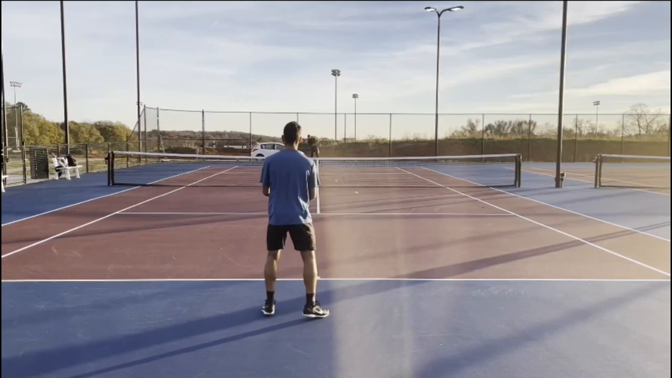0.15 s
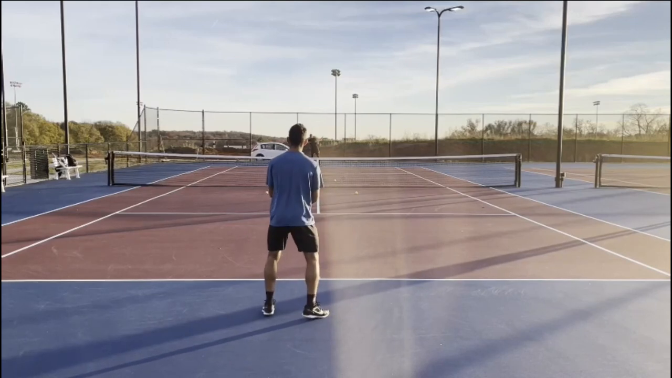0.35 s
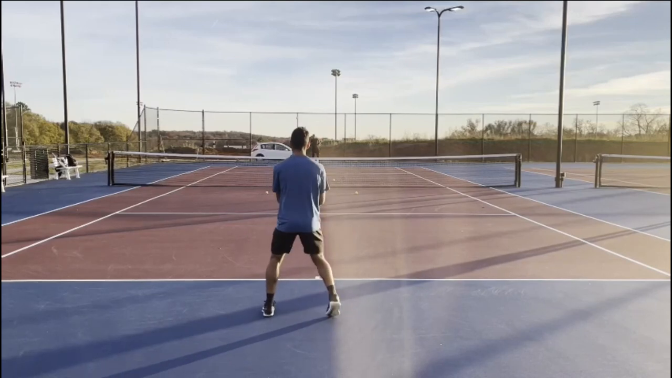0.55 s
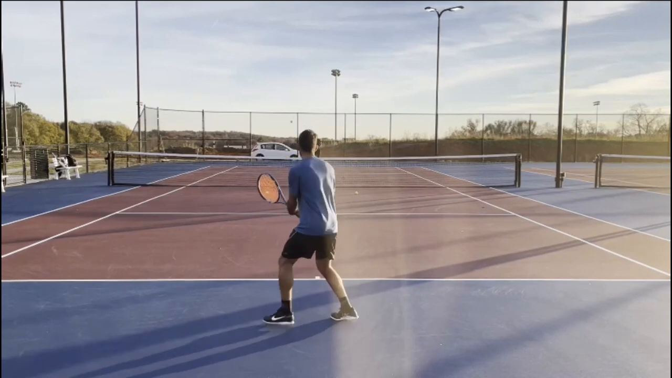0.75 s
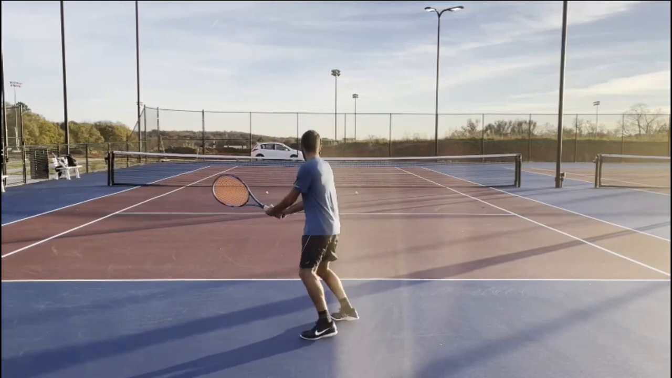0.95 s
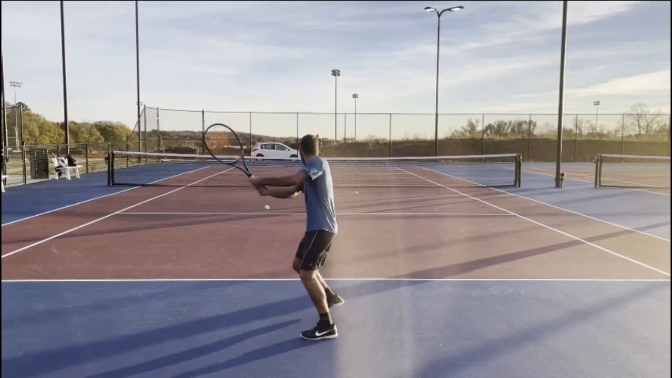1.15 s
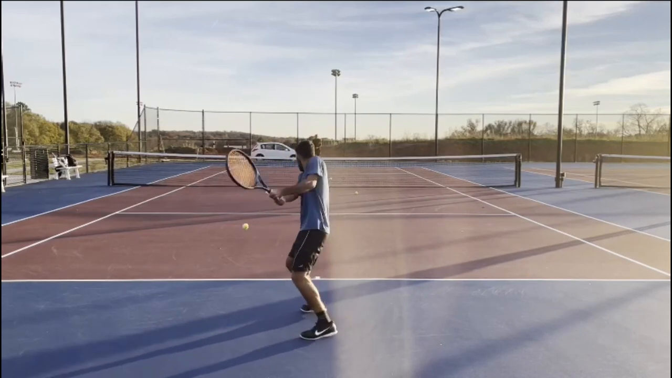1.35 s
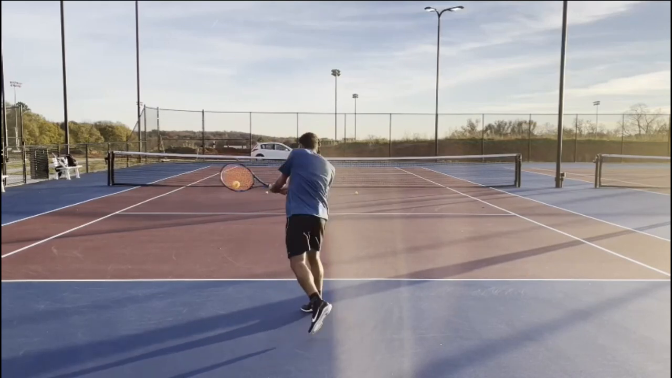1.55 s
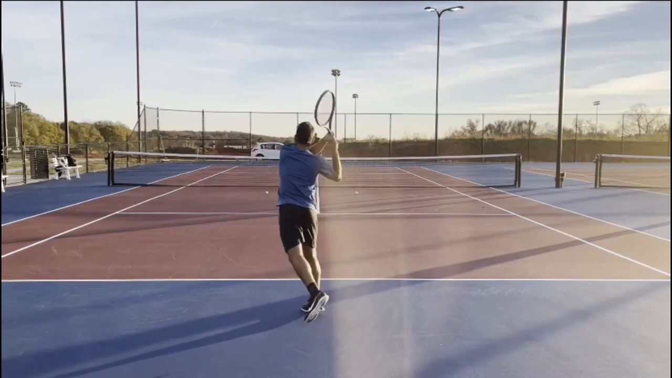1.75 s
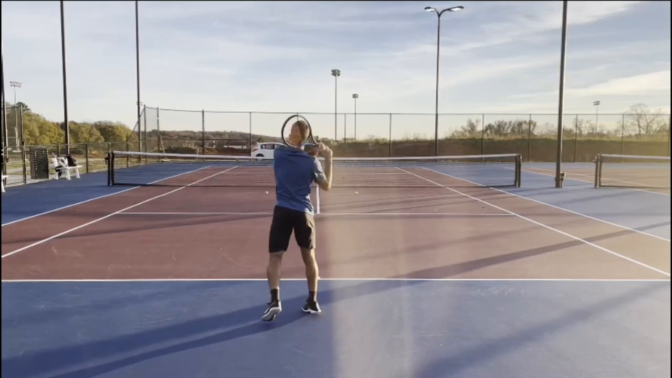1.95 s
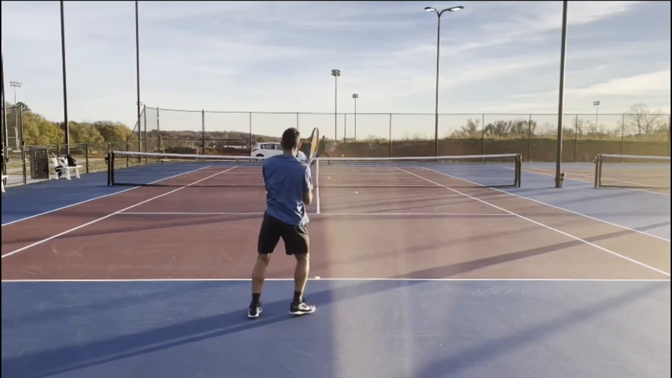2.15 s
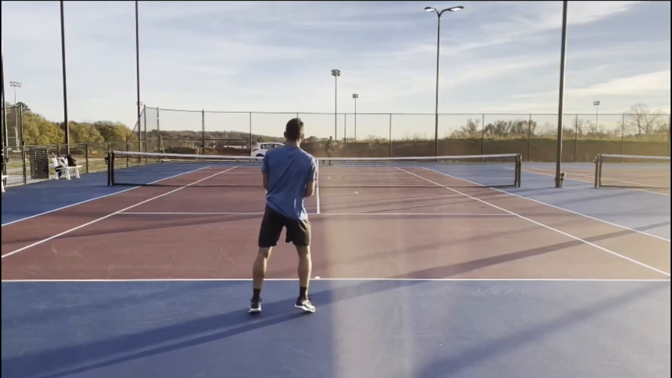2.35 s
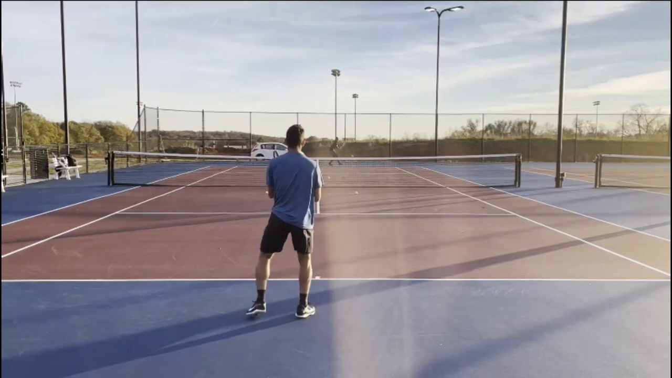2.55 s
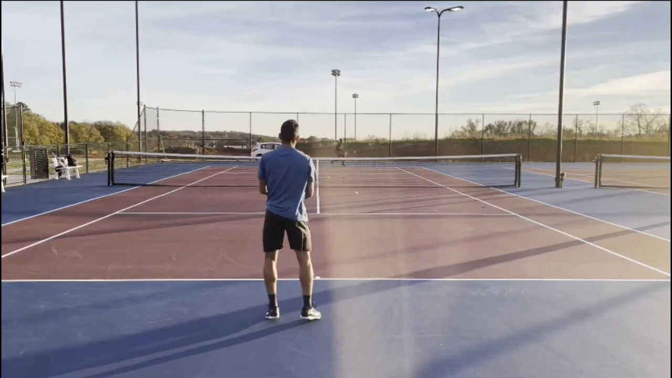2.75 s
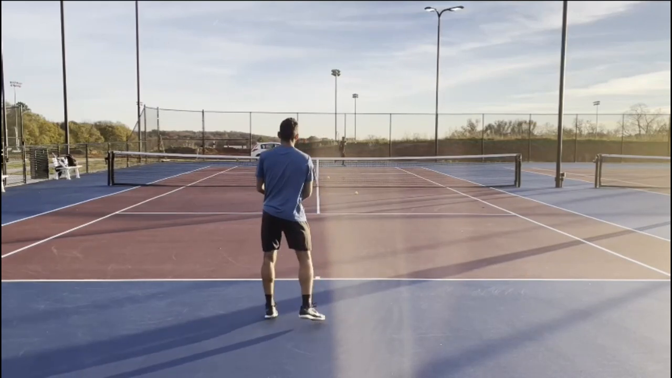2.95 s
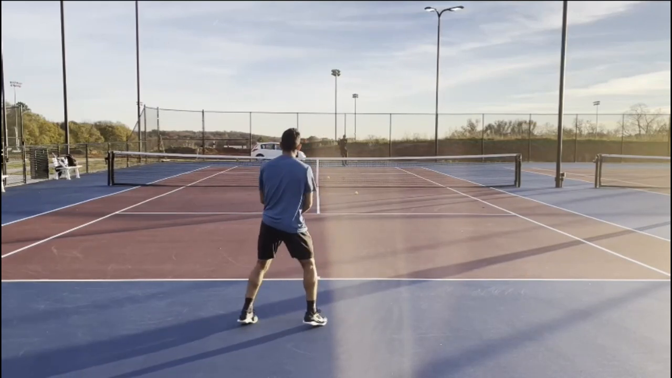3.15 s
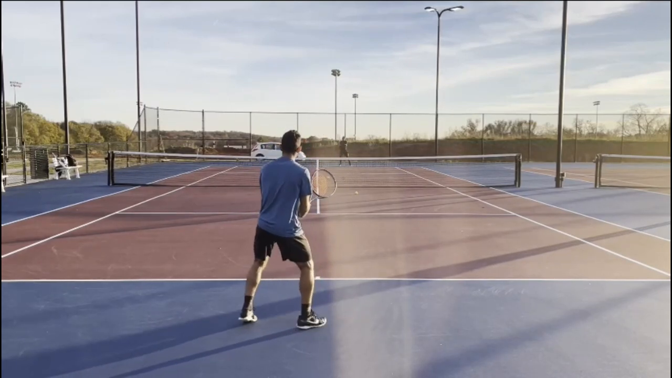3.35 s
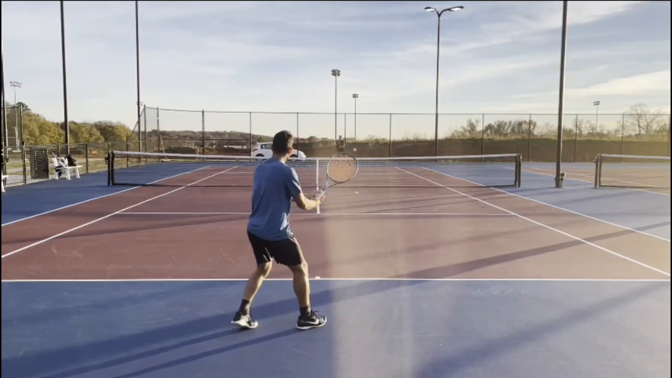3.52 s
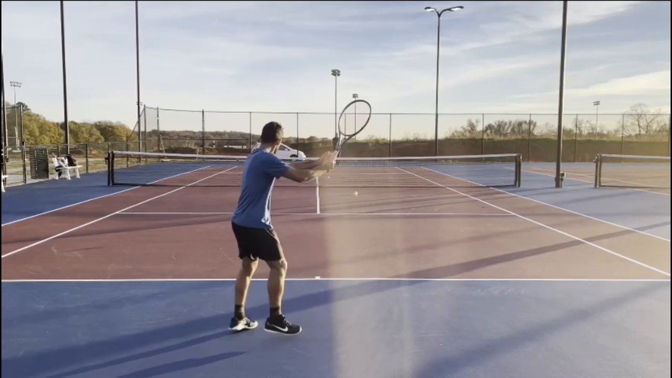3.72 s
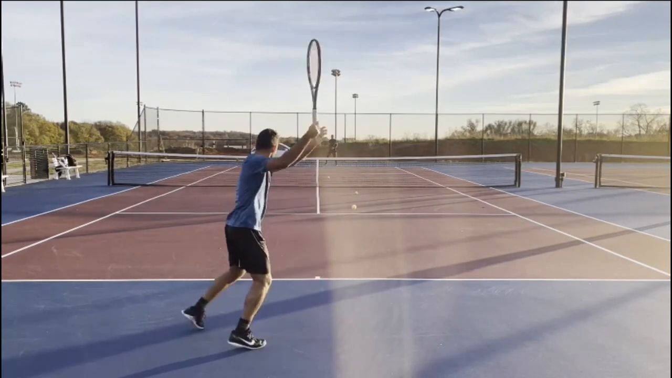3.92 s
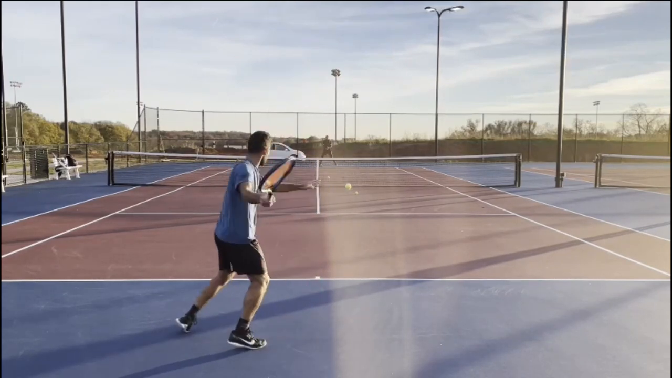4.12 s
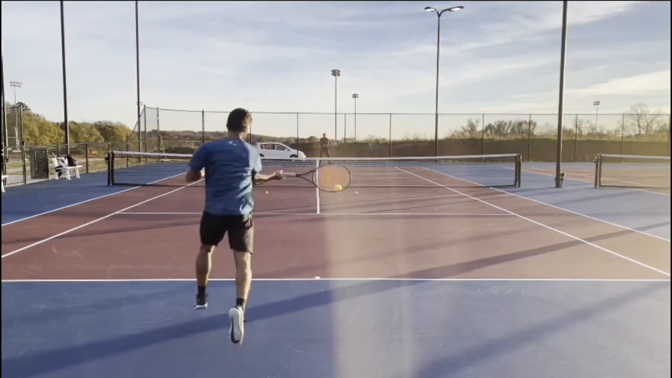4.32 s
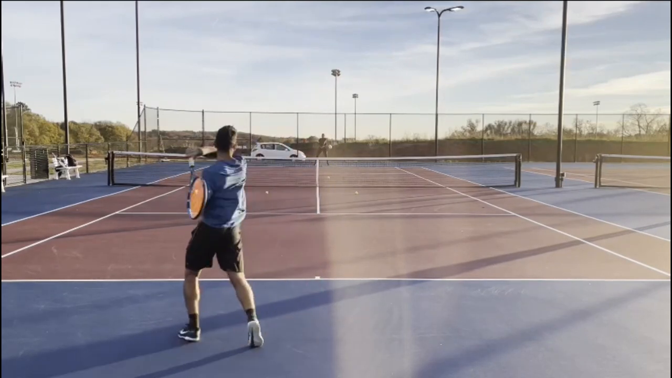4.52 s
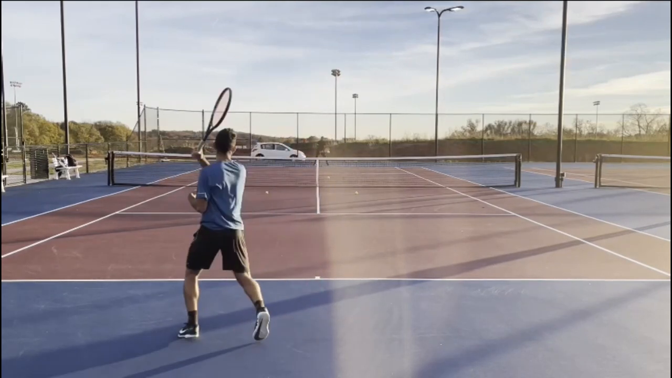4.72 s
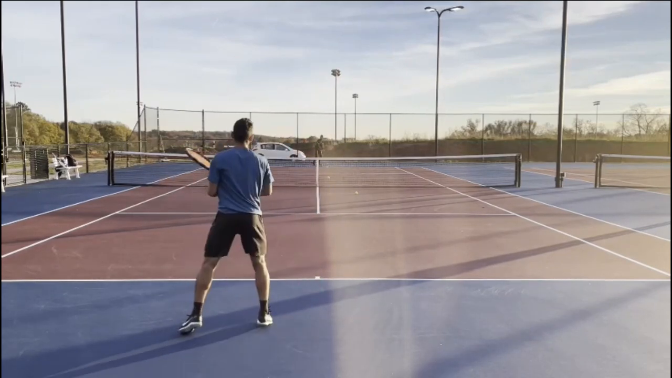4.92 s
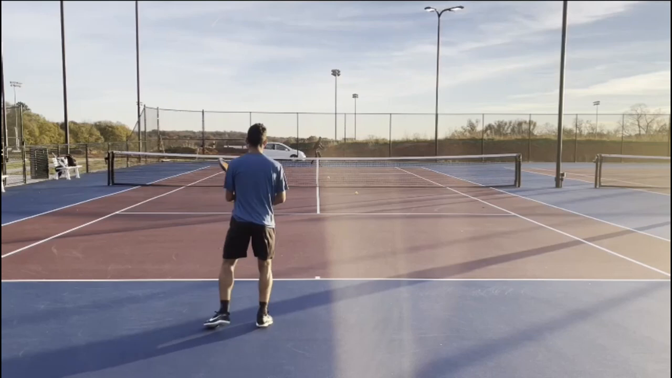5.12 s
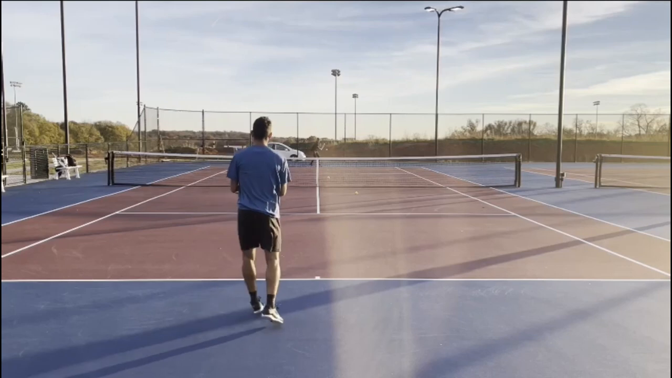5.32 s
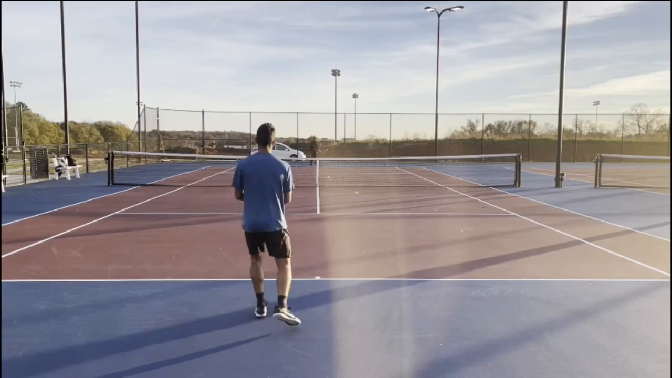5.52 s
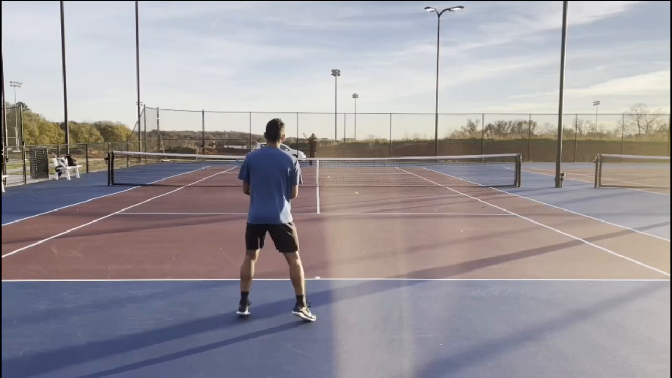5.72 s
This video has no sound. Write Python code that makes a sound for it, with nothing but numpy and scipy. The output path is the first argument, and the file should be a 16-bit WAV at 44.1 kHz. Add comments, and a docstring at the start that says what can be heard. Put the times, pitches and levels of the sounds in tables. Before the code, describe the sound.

On an outdoor hard court, heard from just behind the near player, a faint hollow pock comes from the far side. The tennis ball bounces and the close racket hits it with a sharp pop and briefly ringing strings. The far racket answers, and the bounce, close hit and distant reply repeat. Shoes scuff, thump and squeak lightly between strokes. Each hit has a short echo, and distant traffic rumbles faintly underneath.

```python
"""A faint, hollow pock comes from across an outdoor tennis court, over the rumble of distant traffic.
A rally follows, heard from just behind the near player, whose racket pops and cracks as the ball
squeezes against the strings and leaves them ringing. The far racket answers with its duller pock.
The ball slaps the hard court, and shoes thump, scuff and squeak on the gritty paint.
Fences throw back a short echo, while far-off engines drone and whine."""
import sys
import numpy as np
from scipy import signal
from scipy.fft import rfft, irfft
from scipy.io import wavfile

SR = 44100
rng = np.random.default_rng(int(sys.argv[2]) if len(sys.argv) > 2 else 0)


def generate_wav(sig):
    """Save sig (samples, or channels by samples) to the path in sys.argv[1] as 16-bit PCM at SR."""
    pcm = np.round(np.clip(np.atleast_2d(sig).T, -1, 1) * 32767).astype(np.int16)
    wavfile.write(sys.argv[1], SR, pcm)


N = 254898
TIME = np.arange(N) / SR
BLOW_TIME = TIME[:SR // 3]  # the clock of one short sound, in seconds

# tone colour of the road rumble, engine drone and tyre wash: f/Hz, relative level/dB
RUMBLE_SPECTRUM = [(20, -28.5), (32, -20), (45, -10), (58, 1.5), (72, -1.5), (90, -19.5), (130, -48)]
DRONE_SPECTRUM = [(50, -39), (68, -5.5), (82, -0.5), (100, 2), (135, -7.5), (165, -15.5), (220, -30),
                  (400, -63)]
TYRE_SPECTRUM = [(100, -2.5), (170, 3), (260, -3.5), (420, -8.5), (620, -10), (850, -9), (1200, -13.5),
                 (1700, -17), (2400, -30.5), (3300, -39.5), (4500, -42), (7000, -48.5), (12000, -48.5)]
# how the rumble and the drone swell and fade: t/s, relative level/dB
RUMBLE_SWELL = [(0.0, -51), (0.05, -53), (2.51, -48), (2.64, -45), (4.12, -46), (4.55, -41), (5.78, -47)]
DRONE_SWELL = [(0.0, -53), (0.61, -51), (1.0, -53), (1.61, -49), (2.19, -48), (2.91, -37), (3.69, -40),
               (4.77, -39), (5.3, -45), (5.78, -46)]
# hum of an idling engine: f/Hz, level/dB
IDLE_TONES = [(59, -52), (95, -54)]
# soles sliding and turning: t/s, build-up/s, level/dB, rasp centre f/Hz
SHOE_SCUFFS = [(0.155, 0.019, -57.5, 3180), (0.430, 0.039, -66.5, 4000), (0.625, 0.063, -67, 4000),
               (0.737, 0.011, -67.5, 4000), (0.897, .004, -47.5, 4800), (0.918, .048, -39, 5200),
               (1.020, 0.075, -67.5, 4740), (1.265, 0.03, -53.5, 5100), (1.460, .13, -60, 4200),
               (1.750, .075, -67, 4500), (2.060, .065, -59, 3270), (2.122, .019, -38, 3000),
               (2.403, 0.018, -64.5, 3010), (2.699, 0.034, -67.5, 3000), (2.833, .012, -50, 3720),
               (3.035, 0.044, -54.5, 2960), (3.128, .032, -45.5, 3000), (3.297, .03, -54.5, 2000),
               (3.545, .026, -63.5, 3980), (3.779, 0.042, -53, 3200), (3.885, 0.026, -50.5, 2960),
               (4.262, 0.027, -54.5, 3010), (4.326, 0.075, -49.5, 3000), (4.478, 0.015, -49.5, 3600),
               (4.540, 0.028, -57, 3500), (4.968, .012, -52, 2400), (4.985, .04, -54.5, 2300),
               (5.128, 0.026, -60, 4500), (5.280, 0.025, -58, 2800), (5.377, .004, -68, 3000),
               (5.580, .11, -69, 4000), (5.744, .02, -43.5, 2740)]
# rubber squeaking as a shoe brakes: peak t/s, width/s, level/dB, f/Hz at the peak, glide/(octaves per s)
SHOE_SQUEAKS = [(0.966, 0.012, -46.5, 5600, 0), (3.167, .011, -44.5, 3100, -21.5),
                (3.237, 0.016, -57, 4200, -3), (3.325, .018, -55, 2255, 0)]
# soles landing: t/s, thump level/dB, grit level/dB
SHOE_LANDINGS = [(0.157, -44, -60), (0.616, -43, -72), (1.495, -51, -46.5), (2.078, -46, -49),
                 (2.406, -44, -68), (2.473, -41, -49), (2.835, -46.5, -46), (3.069, -41.5, -56.5),
                 (3.129, -45, -45), (3.5325, -31.5, -61), (4.4807, -18.5, -37.5), (5.124, -38.5, -55),
                 (5.263, -50, -50)]
# ball hitting the court: t/s, slap level/dB, slap f/Hz, thump level/dB, thump f/Hz, grit level/dB
BALL_BOUNCES = [(1.3058, -23.5, 1277, -24, 240.5, -35.5), (2.7700, -44, 895, -33, 357, -59),
                (3.8800, -22, 1320, -22, 298, -37)]
# far racket hitting the ball: t/s, pock level/dB, pitch factor, tick level/dB
FAR_HITS = [(0.1196, -29, 0.89, -44), (2.9580, -13.4, 1.04, -30), (5.6946, -17, 0.94, -33.5)]
# vibrations in the pock that carries across the court: f/Hz, relative level/dB, swell time/s
POCK_MODES = [(188, -12.5, 0.0012), (389, 2.5, 0.00089), (972, -0.5, .0012), (1310, -11, 0.00086)]
# near racket hitting the ball: t/s, pop level/dB, pitch factor, strings level/dB, scrape level/dB,
# crack level/dB, crack centre f/Hz, left over right/dB
NEAR_HITS = [(1.5990, -7.6, 1.05, -33.5, -18.5, -25, 2000, 2.9),
             (4.3705, -6.5, 0.939, -24, -24.5, -21, 2400, .5)]
# vibrations in the pop of ball and strings: f/Hz, relative level/dB, swell time/s
POP_MODES = [(140, -10, .002), (508, -0.5, .0013), (784, -9, .0018), (1047, -6, 0.0015), (1840, -9, .001),
             (2620, -19, 0.00086)]
# strings and frame ringing on: f/Hz, relative level/dB, time to fade by 60 dB/s
STRING_MODES = [(433, 1, .15), (685, -7, 0.071), (856, -9, .07), (980, -8.5, .07), (1136, -4.5, 0.066),
                (1270, -12, 0.13), (1595, -15, .08), (2130, -19.5, 0.079), (2420, -15.5, 0.093),
                (2870, -19, 0.066), (3470, -22, .05), (6160, -19.5, .05)]


def from_db(db):
    return 10 ** (np.asarray(db) / 20)


def rms_one(x):
    """Scales a sound to an average strength (rms) of 1."""
    return x / np.sqrt(np.mean(x ** 2) + 1e-20)


def dying(t, t60):
    """Stays at 1 until t = 0, then falls by 60 dB every t60 seconds."""
    return np.exp(-np.log(1000) * np.maximum(t, 0) / t60)


def hump(t, width_s):
    """A smooth rise and fall with its peak at t = 0."""
    return np.exp(-.5 * (t / width_s) ** 2)


def add(track, s, sound):
    """Mixes a sound into the track from second s on."""
    start = max(int(round(s * SR)), 0)
    part = sound[..., :max(N - start, 0)]
    track[..., start:start + part.shape[-1]] += part


def band(x, low_hz, high_hz, order=2):
    """Keeps the part of a sound between two frequencies."""
    sos = signal.butter(order, [low_hz, min(high_hz, .45 * SR)], "band", fs=SR, output="sos")
    return signal.sosfilt(sos, x)


def hiss(low_hz, high_hz, order=2):
    """A short stretch of noise between two frequencies, rms 1."""
    return rms_one(band(rng.standard_normal(len(BLOW_TIME)), low_hz, high_hz, order))


def drift(rate, size):
    """Wanders by about 1 either way, heading for a new random value `rate` times a second."""
    steps = np.arange(size) / SR * rate
    return np.interp(steps, np.arange(size // 20), rng.standard_normal(size // 20))


def panned(x, balance_db, lead_s):
    """A source left of centre is louder on the left and arrives there first."""
    hz = np.fft.rfftfreq(2 * len(x), 1 / SR)
    late = irfft(rfft(x, 2 * len(x)) * np.exp(-2j * np.pi * hz * lead_s))[:len(x)]
    return np.array([x, late]) * from_db(np.array([[.5], [-.5]]) * balance_db)


def wide_noise(spectrum, side_db):
    """Steady stereo noise of a given tone colour, rms 1; a higher side_db makes it wider."""
    hz, level_db = np.transpose(spectrum)
    log_hz = np.log(np.fft.rfftfreq(N, 1 / SR) + 1)
    gain = from_db(np.interp(log_hz, np.log(hz), level_db, left=-90, right=-120))
    mid, side = irfft(rfft(rng.standard_normal((2, N))) * gain, N)
    return rms_one(mid + from_db(side_db) * side * np.array([[1], [-1]]))


def knock(hz, swell_s):
    """A vibration that swells while the ball or sole is squeezed, then dies at once."""
    t = BLOW_TIME / swell_s
    return t * np.exp(1 - t) * np.sin(2 * np.pi * hz * BLOW_TIME)


def struck_body(modes, pitch):
    """Several knocks start together, each swinging the opposite way to its neighbour."""
    return sum((-1) ** k * from_db(db) * knock(hz * pitch, swell_s)
               for k, (hz, db, swell_s) in enumerate(modes))


def traffic(rise_hz_per_s=3.8, pass_s=1.8, fade_db_per_s=2.4):
    """Road, engines and tyres blend far away; one vehicle's whine rises as it speeds up and passes."""
    out = from_db(1.5 + np.interp(TIME, *np.transpose(RUMBLE_SWELL))) * wide_noise(RUMBLE_SPECTRUM, -18)
    out += from_db(2.6 + np.interp(TIME, *np.transpose(DRONE_SWELL))) * wide_noise(DRONE_SPECTRUM, -14.5)
    out += from_db(-55.5) * wide_noise(TYRE_SPECTRUM, side_db=-1)
    whine_hz = 339 + rise_hz_per_s * TIME
    whine_db = -63.7 - fade_db_per_s * np.abs(TIME - pass_s)
    for hz, db in [(whine_hz, whine_db), *IDLE_TONES]:
        phase = 2 * np.pi * np.cumsum(hz + 1.316 * drift(7, N)) / SR
        out += np.sqrt(2) * from_db(db + 2.1 * drift(6, N)) * np.sin(phase)
    return out


def echoes(x, early_db, late_db, fence_db, fence_s, side_db=-6):
    """Sound scatters quickly off the ground, leaves a dull tail and comes back blurred from the fence."""
    t = BLOW_TIME

    def response():
        early = hiss(250, 7000, order=1) * dying(t, t60=.11) * (t > .004)
        late = hiss(350, 3000, order=1) * dying(t, t60=.57) * (t > .015)
        fence = hiss(850, 1350) * hump(t - fence_s, width_s=.027)
        parts = ((early_db, early), (late_db, late), (fence_db, fence))
        return sum(from_db(db) * rms_one(part) for db, part in parts) / np.sqrt(len(t))
    pair = response() + from_db(side_db) * response() * np.array([[1], [-1]])
    return signal.fftconvolve(x[None], pair, axes=1)[:, :N]


def loose_sand(ticks_per_s=10, level_db=-76, spread_db=2.5):
    """Single grains crack at random under the shifting feet."""
    out = np.zeros(N)
    tick = hiss(2000, 7000, order=1) * dying(BLOW_TIME, t60=.016)
    sizes_db = rng.normal(level_db, spread_db, N)
    for i in np.flatnonzero(rng.random(N) < ticks_per_s / SR):
        add(out, TIME[i], from_db(sizes_db[i]) * tick)
    return out


def scuffs(spread=1.56, start_db=-11, grain_db=3.5, stutter_db=2, bite_s=.0023,
           ticks_per_s=170, tick_db=14, light_db=-60.5, light_t60=.18):
    """A sole bites, presses harder and lets go; sand grains tick in the rasp and the rubber stutters."""
    out, t = np.zeros(N), BLOW_TIME
    for s, build_s, db, centre_hz in SHOE_SCUFFS:
        t60 = light_t60 * .5 ** (.065 * (db - light_db))  # a harder grip stops sooner
        build_up = from_db(start_db * np.maximum(1 - t / build_s, 0))
        pressure = np.minimum(t / bite_s, 1) * build_up * dying(t - build_s, t60)
        grains = rng.standard_normal(len(t)) * from_db(grain_db * drift(1400, len(t)))
        grains += from_db(tick_db) * rng.standard_normal(len(t)) * (rng.random(len(t)) < ticks_per_s / SR)
        rasp = band(grains, centre_hz / spread, centre_hz * spread, order=1)
        rasp = rms_one(band(rasp, 1000, 7300, order=3))
        fizz_db = -11 + 5 * np.log2(centre_hz / 4020)  # a brighter rasp fizzes more
        fizz = from_db(fizz_db) * rms_one(band(grains, 10000, 13000))
        add(out, s, from_db(db + stutter_db * drift(170, len(t))) * pressure * (rasp + fizz))
    return out


def squeaks(wobble=.13):
    """Rubber sticks and slips unevenly; in some squeaks the pitch falls as the shoe slows."""
    out, middle = np.zeros(N), BLOW_TIME[-1] / 2
    t = BLOW_TIME - middle
    for s, width_s, db, hz, glide in SHOE_SQUEAKS:
        slip_hz = hz * 2 ** (glide * t) * (1 + wobble * drift(1500, len(t)))
        phase = 2 * np.pi * np.cumsum(slip_hz) / SR
        add(out, s - middle, from_db(db) * hump(t, width_s) * np.sin(phase))
    return out


def court_blows(rows, slap_s, thump_s, lag_s, grit_t60):
    """The first touch on the court slaps and crunches grit; the thump of the full weight follows."""
    out = np.zeros(N)
    for s, slap_db, slap_hz, thump_db, thump_hz, grit_db in rows:
        grit = from_db(grit_db) * hiss(1500, 9000, order=1) * dying(BLOW_TIME, grit_t60)
        add(out, s, from_db(slap_db) * knock(slap_hz, slap_s) + grit)
        add(out, s + lag_s, from_db(thump_db) * knock(thump_hz, thump_s))
    return out


def footfalls(slap_hz=1070, thump_hz=320, slap_db=-5.5):
    """Every sole lands with the same two pitches: a light slap, then a stronger thump."""
    rows = [(s, db + slap_db, slap_hz, db, thump_hz, grit_db) for s, db, grit_db in SHOE_LANDINGS]
    return court_blows(rows, slap_s=.00053, thump_s=.0013, lag_s=.0015, grit_t60=.01)


def bounces():
    """The ball slaps the court and thumps as it is squeezed flat."""
    return court_blows(BALL_BOUNCES, slap_s=.00051, thump_s=.0015, lag_s=.0017, grit_t60=.0079)


def far_racket(lead_s=.00299, felt_db=-11, wash_db=-24):
    """Across the court a hit is a faint tick of felt, a hollow pock and a thin wash off the wire fence."""
    out, t = np.zeros(N), BLOW_TIME
    for s, pock_db, pitch, tick_db in FAR_HITS:
        tick = (hiss(1000, 1860) + from_db(felt_db) * hiss(2000, 7000, order=1)) * dying(t, t60=.033)
        wash = from_db(wash_db) * hiss(1400, 5000, order=1) * dying(t, t60=.33)
        add(out, s - lead_s, from_db(tick_db) * (tick + wash) * np.minimum(t / lead_s * 2, 1))
        add(out, s, -from_db(pock_db) * struck_body(POCK_MODES, pitch))
    return out


def swings(swish_db=-46, width_s=.018):
    """Air whooshes through the near racket, loudest where it moves fastest: as it meets the ball."""
    out, middle = np.zeros(N), BLOW_TIME[-1] / 2
    for s, *_ in NEAR_HITS:
        add(out, s - middle, from_db(swish_db) * hiss(280, 800) * hump(BLOW_TIME - middle, width_s))
    return out


def ringing_strings(spread_db=1.7):
    """Strings and frame ring on, with a slightly different mix of tones after each hit."""
    out = np.zeros(len(BLOW_TIME))
    for k, (hz, db, t60) in enumerate(STRING_MODES):
        tone = (-1) ** k * np.sin(2 * np.pi * hz * BLOW_TIME)
        out += from_db(db + rng.normal(0, spread_db)) * dying(BLOW_TIME, t60) * tone
    return out


def near_racket(scrape_s=.0032, sting_db=-7, ground_s=.0052, ground_db=-16, lead_s_per_db=.000024):
    """Felt scrapes the strings, the ball pops off with a crack, and the ground reflects the blow."""
    out, t = np.zeros((2, N)), BLOW_TIME
    for s, pop_db, pitch, strings_db, scrape_db, crack_db, crack_hz, balance_db in NEAR_HITS:
        strings = from_db(strings_db) * ringing_strings()
        crack = hiss(crack_hz / 1.8, crack_hz * 1.9) * dying(t, t60=.028)
        crack += from_db(sting_db) * hiss(5300, 12000) * dying(t, t60=.0099)
        scrape = hiss(700, 3000, order=1) + from_db(-13.5) * hiss(4000, 10000)
        scrape *= from_db(scrape_db) * np.minimum(t / scrape_s, 1) * dying(t - scrape_s, t60=.022)
        blow = from_db(crack_db) * crack - from_db(pop_db) * struck_body(POP_MODES, pitch)
        reflection = from_db(ground_db) * blow
        for delay_s, part in ((-scrape_s, scrape), (0, blow + strings), (ground_s, reflection)):
            add(out, s + delay_s, panned(part, balance_db, lead_s=lead_s_per_db * balance_db))
    return out


def scene():
    """Rackets, ball and feet, set between left and right, with their echoes and the traffic behind."""
    near, far, ball = near_racket(), far_racket(), bounces()
    feet = footfalls() + scuffs() + squeaks() + loose_sand()
    echo = echoes(near.mean(axis=0) + ball + feet, early_db=-21, late_db=-27, fence_db=-42, fence_s=.12)
    echo += echoes(far, early_db=-23, late_db=-26.5, fence_db=-40.5, fence_s=.05)
    players = panned(ball + feet, balance_db=3.2, lead_s=.000014)
    players += panned(far + swings(), balance_db=-.3, lead_s=.000014)
    background = (echo + traffic()) * from_db([[.55], [-.55]])  # a little louder on the left
    return near + players + background


def record(dry, ceiling=.92, dip_hz=8700, dip_db=-14, ring_hz=11200, ring_db=1.5,
           shade_hz=5200, shade_db=-4.5, cutoff_hz=12200):
    """The hardest peaks are rounded. The treble is hollowed out near 8.7 kHz,
    coloured slightly differently left and right, and cut off at the top."""
    dip = signal.iirpeak(dip_hz, Q=dip_hz / 2600, fs=SR)
    ring = signal.iirpeak(ring_hz, Q=9, fs=SR)
    shade = signal.iirpeak(shade_hz, Q=shade_hz / 2200, fs=SR)
    x = dry / (1 + (dry / ceiling) ** 4) ** .25
    x += (from_db(dip_db) - 1) * signal.lfilter(*dip, x)
    left, right = x + (from_db(ring_db) - 1) * signal.lfilter(*ring, x)
    left -= 2 * signal.lfilter(*dip, left)  # flips the wave in this band, at the same loudness
    right += (from_db(shade_db) - 1) * signal.lfilter(*shade, right)
    return signal.sosfilt(signal.ellip(10, .5, 80, cutoff_hz, fs=SR, output="sos"), [left, right])


dry = scene()
out = record(dry)
generate_wav(out)
```